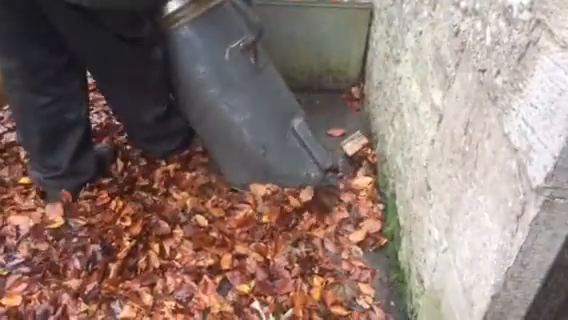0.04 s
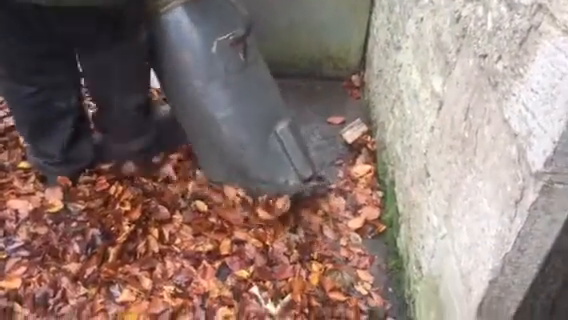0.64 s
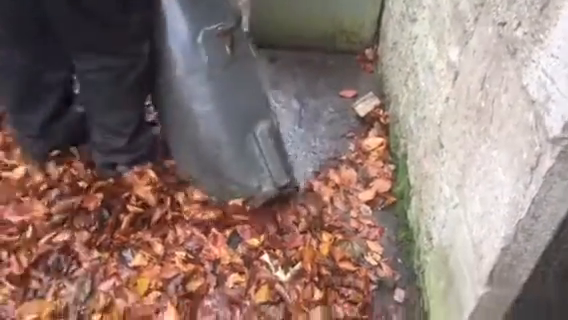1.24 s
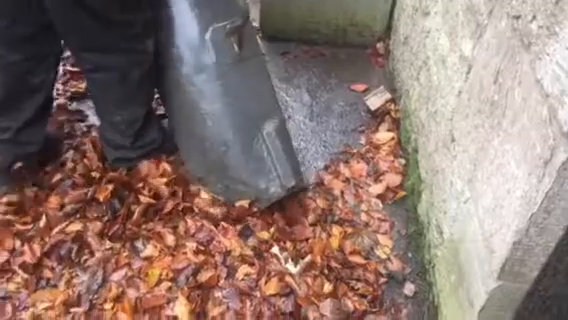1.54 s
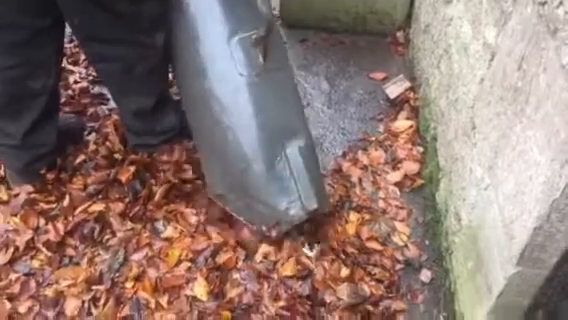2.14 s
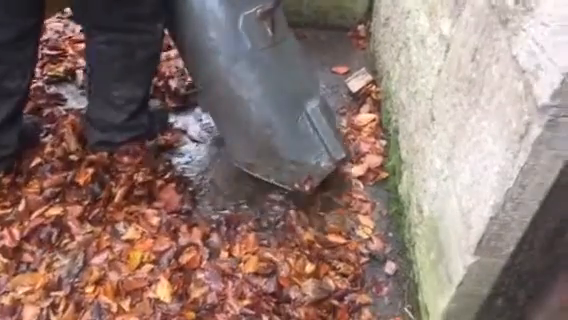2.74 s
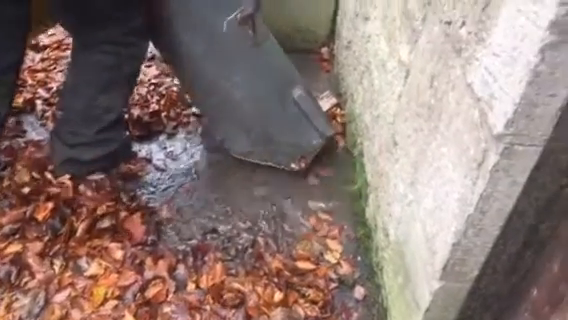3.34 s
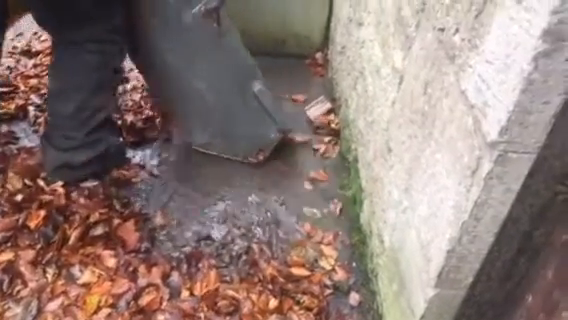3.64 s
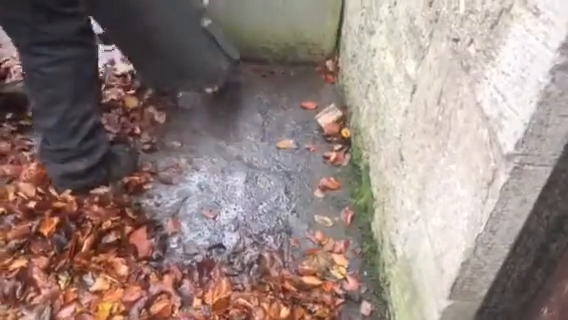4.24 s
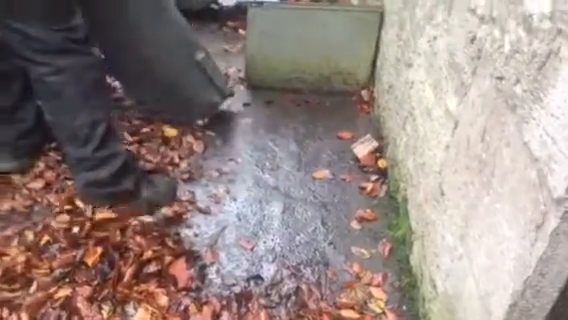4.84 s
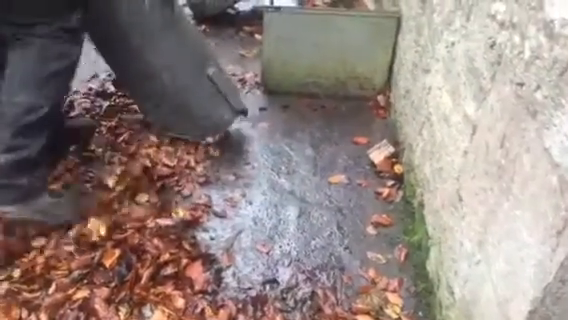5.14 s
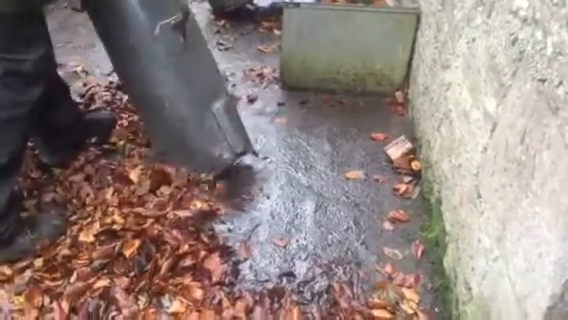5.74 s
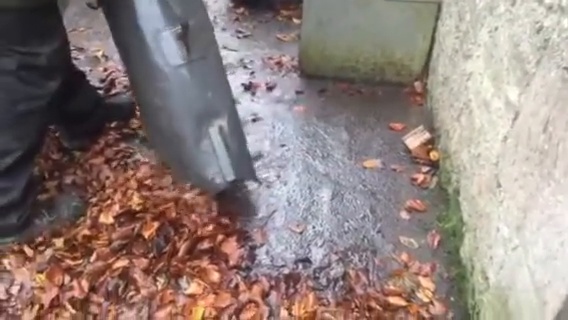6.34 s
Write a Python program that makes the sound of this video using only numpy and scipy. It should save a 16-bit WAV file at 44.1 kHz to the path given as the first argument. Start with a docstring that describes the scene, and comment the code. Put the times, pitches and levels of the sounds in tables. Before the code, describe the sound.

A loud engine-driven leaf vacuum runs close by outdoors for the whole six and a half seconds, holding a steady speed. Its low drone dominates, dipping briefly whenever leaves choke the intake. Above it a fainter fan whine throbs about four times a second, most clearly in the first three seconds. Air roars hollowly in the wide tube and hisses at the nozzle, mixed with a fine, dense patter of wet leaves lifted from the paving.

Short raspy slurps come at about 0.3, 0.5, 1.2, 2 and 2.5 seconds. From 3.4 to 4.2 seconds, clumps of leaves pass through the hose in a run of dull thumps, with low buffeting and more slurps, the strongest thump near 4 seconds. A lighter knock comes at 5.2 seconds. Further slurps and low gusts gather around 6 seconds, with another firm thump at 6.3, and the machine keeps running.

```python
"""Leaf vacuum on wet paving

An engine-driven leaf vacuum runs at a steady speed while its wide hose sweeps the ground. The impeller
(the wheel that sucks the air) drones, and a faster cooling fan whines above it. Air rushes into the
nozzle, wet leaves patter and slurp up the tube, and clumps thump in the hose. Heard close by, in mono."""
import sys
import numpy as np
from scipy import signal
from scipy.fft import rfft, irfft, next_fast_len
from scipy.io import wavfile

SR = 44100
rng = np.random.default_rng(int(sys.argv[2]) if len(sys.argv) > 2 else 0)


def generate_wav(sig):
    """Save sig (samples, or channels by samples) to the path in sys.argv[1] as 16-bit PCM at SR."""
    pcm = np.round(np.clip(np.atleast_2d(sig).T, -1, 1) * 32767).astype(np.int16)
    wavfile.write(sys.argv[1], SR, pcm)


N = 287091

# The fan's whine. Each row: time in seconds, relative level in dB, depth of its throb from 0 to 1.
FAN_WHINE = [(0, -37, .85), (.7, -44.5, .9), (1.8, -38, .7), (2.6, -39, .65), (3.1, -50, 0.2),
             (4.2, -41, 0.34), (5.4, -39.5, 0.4), (6.5, -41, 0.3)]


def impeller(angle, blades=3):
    """The blades drone at three times the shaft's speed, and sag when leaves choke the intake."""
    # The drone. Each row: time in seconds, relative level in dB.
    drone = [(0.0, -16), (0.25, -14.5), (1.63, -17), (1.72, -16), (3.24, -16), (3.66, -19), (4.42, -15.5),
             (4.86, -18.5), (5.15, -16.5), (5.51, -19), (6.44, -15), (6.51, -16.5)]
    # Brief chokes. Each row: middle in seconds, drop in dB.
    chokes = [(.18, 5), (.8, 6), (1.16, 6), (1.27, 3), (1.82, 2), (2.25, 2.5), (3.46, 3), (3.77, 4),
              (3.89, 3.5), (4.08, 1), (5.54, 2.5), (5.75, 3)]
    sag_db = sum(drop * swell(s, length=0.07) for s, drop in chokes)
    tone = rotor_tones(angle, [(blades, 0)], waver_db=0.62, wobble=0.065, rate=10.6)
    return from_db(in_time(drone)[0] - sag_db + 0.1) * tone


def engine(angle):
    """The engine hums with weaker tones tied to the turning of its shaft."""
    # Each row: multiple of the shaft's speed, level in dB.
    tones = [(1, -51), (1.5, -44.5), (2, -30.5), (3.5, -43.5), (4, -37), (4.5, -43.5), (5, -47.5),
             (5.5, -48.5), (6, -45.5), (9, -44.5), (19, -57.5), (20, -54.5), (30, -52)]
    return rotor_tones(angle, tones, waver_db=0.6, wobble=0.24, rate=3.9)


def cooling_fan(fan_angle, blades=5):
    """The fan whines at the rate its blades pass."""
    tone = rotor_tones(fan_angle, [(blades, 0)], waver_db=1.5, wobble=0.42, rate=31)
    return from_db(in_time(FAN_WHINE)[0] - 2.9) * tone


def fan_throb(first_crest_s=0.038):
    """Loudness of two close tones beating against each other: broad crests and narrow dips."""
    # Each row: time in seconds, throbs per second.
    pace = [(0, 3.6), (.7, 3.6), (2, 4.25), (3.5, 4.35), (4.5, 4.15), (5.5, 4.1), (5.8, 5.4), (6.5, 5.3)]
    depth = in_time(FAN_WHINE)[1]
    beats = np.cumsum(in_time(pace)[0]) / SR - first_crest_s * pace[0][1]
    return np.abs(1 + depth * np.exp(2j * np.pi * beats)) / np.sqrt(1 + depth ** 2)


def casing(fan_angle, throb):
    """The casing gives off weaker fan tones, its own ringing and a wash of air that throbs less."""
    # Each row: multiple of the fan's speed, relative level in dB.
    fan_tones = [(3, -43.5), (4, -53), (7, -52.5), (8, -46.5), (9, -46)]
    # Where the casing rings. Each row: pitch in Hz, width in Hz, relative level in dB.
    rings = [(710, 68, -42), (976, 38, -45.5), (1040, 34, -47.5), (1070, 72, -50), (1250, 27, -51.5),
             (1476, 230, -45)]
    # Each row: frequency in Hz, relative level in dB.
    wash_spectrum = [(250, -17), (480, -5.5), (600, 3.5), (720, -6), (880, -20), (1070, -11), (1400, -4.5),
                     (2200, -24), (6000, -9)]
    # How openly the casing is heard. Each row: time in seconds, gain in dB.
    openness = [(0, 0), (.4, 0.5), (1.2, -2), (1.6, -3.5), (2.8, -5), (4.3, -4), (4.8, -2.5), (5.4, -2.5),
                (5.8, -0.5), (6.5, -0.5)]
    tones = rotor_tones(fan_angle, fan_tones, waver_db=1.5, wobble=0.33, rate=8.9)
    ring = sum(from_db(db) * unit_level(resonance(rng.standard_normal(N), hz, width))
               for hz, width, db in rings)
    wash = from_db(-39.5) * coloured(rng.standard_normal(N), wash_spectrum)
    return from_db(in_time(openness)[0]) * (throb ** 0.65 * (tones + ring) + throb ** 0.17 * wash)


def hose_rumble():
    """Air buffets the hose, steadily and in gusts."""
    # Each row: middle in seconds, length in seconds, level in dB.
    gusts = [(.3, 1, -32), (3.464, 0.11, -27), (3.83, .18, -25), (4.026, 0.13, -19.5), (4.177, 0.2, -24),
             (5.65, 0.54, -32), (6.02, .12, -21), (6.25, 0.28, -27)]
    # Each row: frequency in Hz, relative level in dB.
    spectrum = [(20, -28), (33, -15), (48, 3.5), (70, 11.5), (100, 3), (140, 3), (220, -44), (400, -42)]
    strength = from_db(-38.5) + sum(from_db(db) * swell(s, length) for s, length, db in gusts)
    return strength * turbulence(spectrum, flutter_db=1.0, rate=21)


def tube_roar():
    """Air rings hollowly in the tube and roars, most strongly when the nozzle is buried in leaves."""
    # Each row: time in seconds, relative level in dB.
    roar_levels = [(0, -30.5), (.85, -33.5), (1.3, -35), (1.65, -32), (2, -27.5), (2.3, -36.5), (2.55, -30),
                   (3.3, -37), (3.6, -40), (4.2, -41.5), (4.8, -34), (5.7, -32.5), (6.1, -28.5),
                   (6.5, -31.5)]
    hollow_levels = [(0, -35.5), (.8, -36), (1.4, -40), (2, -39), (3, -40), (3.9, -36), (4.6, -36.5),
                     (5.3, -37), (6.5, -36)]
    # Each row: frequency in Hz, relative level in dB.
    roar_spectrum = [(50, -26), (90, -6.5), (130, 2), (190, 2.5), (230, -2), (262, 2), (300, -4.5),
                     (450, -18.5), (1200, -32)]
    hollow_spectrum = [(200, -22), (280, -20), (322, -1.5), (355, -1), (400, -0.5), (450, -12.5),
                       (560, -20.5), (1200, -56)]
    roar = turbulence(roar_spectrum, flutter_db=0.7, rate=12)
    hollow = turbulence(hollow_spectrum, flutter_db=1.3, rate=15)
    roar *= from_db(in_time(roar_levels)[0] - 0.5)
    hollow *= from_db(in_time(hollow_levels)[0] - 0.25)
    return roar + hollow


def nozzle():
    """Air rushes in and hisses past the rim, louder as it carries more leaves."""
    # Each row: time in seconds, relative levels of the rush and of the hiss in dB.
    flow = [(0, -31, -31), (.36, -30, -28), (.55, -31, -29), (.72, -33, -31.5), (.87, -30.5, -29),
            (1.35, -33.5, -33.5), (1.65, -33, -33.5), (1.73, -33, -29.5), (2.02, -30, -31.5),
            (2.2, -34.5, -32), (2.34, -33.5, -36), (2.51, -33, -31), (2.9, -33.5, -33), (3.15, -31.5, -31),
            (3.33, -34, -32), (3.77, -31.5, -33), (4.02, -33.5, -32.5), (4.4, -35, -33), (4.82, -34.5, -34),
            (5.05, -31, -30.5), (5.15, -35, -34.5), (5.27, -31, -31), (5.45, -33.5, -35), (5.84, -31, -30),
            (6.5, -31.5, -31)]
    # Each row: frequency in Hz, relative level in dB.
    rush_spectrum = [(250, -12), (480, 1), (600, -4.5), (800, 2), (920, -2), (1080, -1), (1350, -2),
                     (2100, -1), (3000, -4), (4500, -10.5), (8000, -18.5), (16000, -28)]
    hiss_spectrum = [(1000, -24), (2500, -9), (4200, 0), (6000, 0.5), (9200, -0.5), (11500, -2.5),
                     (15500, -5)]
    rush_db, hiss_db = in_time(flow)
    eddies = from_db(0.64 * drift(15))
    rush = from_db(rush_db + 0.34) * turbulence(rush_spectrum, flutter_db=1.1, rate=29)
    hiss = from_db(hiss_db + 1.46) * turbulence(hiss_spectrum, flutter_db=1.02, rate=19)
    leaves = from_db(rush_db - 5) * leaf_patter()
    return eddies * (rush + hiss + leaves)


def leaf_patter(ticks_per_s=4000, spread_db=3, flurry_db=5):
    """Leaf scraps tick against the tube; each size has its own pitch and comes in its own flurries."""
    hits = rng.random(N) < ticks_per_s / SR
    strengths = from_db(spread_db * np.minimum(rng.exponential(1, N), 4)) * rng.choice([-1, 1], N)
    pitches = np.geomspace(1200, 11000, 40)
    scrap_size = rng.integers(0, len(pitches), N)
    out = np.zeros(N)
    for size, hz in enumerate(pitches):
        ticks = strengths * hits * (scrap_size == size) * from_db(flurry_db * drift(13))
        out += resonance(ticks, hz, width=0.046 * hz) / np.sqrt(hz)
    return unit_level(out)


def slurps():
    """A wad of wet leaves narrows the opening for a moment, making a rasp that can slide in pitch."""
    # Each row: middle in seconds, length in seconds, pitch in Hz, slide in octaves, level in dB.
    wads = [(.32, .14, 1300, 0, -34.5), (0.536, 0.057, 6000, 0, -30), (1.187, 0.041, 2000, 0.053, -32.5),
            (1.897, .03, 2490, 0, -33), (1.997, 0.19, 838, 0.073, -40), (2.02, 0.057, 1900, .2, -39),
            (2.533, 0.096, 6240, -0.086, -35), (3.656, 0.055, 4700, -0.09, -32),
            (3.667, 0.27, 1055, 0, -40), (3.738, 0.036, 2365, 0.37, -27), (4.03, .025, 5000, 0, -38),
            (4.088, 0.033, 1700, 0.73, -31.5), (5.103, 0.034, 2185, 0.25, -31.5),
            (5.221, .03, 1800, .4, -30.5), (5.29, 0.05, 3810, 0.35, -32.5), (5.828, 0.1, 3750, 0.17, -32.5),
            (5.99, .12, 3620, 0.37, -32.5), (6.155, .06, 3000, -1.15, -30), (6.483, 0.065, 5500, 0.34, -29)]
    out = np.zeros(N)
    for s, length, hz, slide, db in wads:
        position = np.linspace(-0.5, 0.5, int(length * SR))
        lowpass = signal.butter(2, 0.19 * hz, fs=SR, output="sos")
        rasp = unit_level(signal.sosfilt(lowpass, rng.standard_normal(N // 10))[:len(position)])
        tone = np.sqrt(2) * np.sin(2 * np.pi * np.cumsum(hz * 2 ** (slide * position)) / SR)
        # Multiplying by the tone moves the low noise up around its pitch.
        add(out, s - length / 2, from_db(db) * np.cos(np.pi * position) * rasp * tone)
    return out


def thumps():
    """Each clump makes the soft hose wall ring briefly, with a weaker, shorter tone above."""
    # Each row: start in seconds, pitch in Hz, seconds to fade by 60 dB, level in dB.
    clumps = [(3.412, 160, 0.046, -10.5), (3.46, 48.5, .2, -25), (3.80, 42, .2, -26),
              (3.856, 180, .09, -18), (3.914, 140, .08, -16), (3.97, 66, 0.23, -20),
              (4.004, 142, 0.057, -9), (4.101, 76.4, 0.34, -16), (4.206, 58, .15, -20),
              (5.223, 306, 0.034, -14.5), (6.005, 48, .12, -24), (6.317, 132, 0.06, -9)]
    out, t = np.zeros(N), np.arange(SR // 2) / SR
    for s, hz, ring_s, db in clumps:
        low = from_db(db - 60 * t / ring_s) * np.sin(2 * np.pi * hz * t)
        high = from_db(db - 10 - 60 * t / (0.64 * ring_s)) * np.sin(2 * np.pi * 2.14 * hz * t)
        add(out, s, low - high)
    return out


def rotor_tones(angle, tones, waver_db, wobble, rate):
    """Tones of a spinning part, each wavering in level and in phase (wobble, in radians)."""
    out = np.zeros(N)
    for multiple, db in tones:
        level = np.sqrt(2) * from_db(db + waver_db * drift(rate))
        out += level * np.sin(multiple * angle + wobble * drift(rate) + rng.uniform(0, 2 * np.pi))
    return out


def turbulence(spectrum, flutter_db, rate):
    """Air noise whose strength flutters as the air swirls."""
    return coloured(rng.standard_normal(N) * from_db(flutter_db * drift(rate)), spectrum)


def drift(rate):
    """A smooth random wander of about 1 either way; a higher rate in Hz makes it quicker."""
    r = np.exp(-80 * np.pi * rate / SR)
    slow = signal.lfilter([1], [1, -2 * r, r * r], rng.standard_normal(N // 40 + 2002))[2000:]
    return np.interp(np.arange(N) / 40, np.arange(len(slow)), unit_level(slow))


def coloured(x, spectrum):
    """Shape the lows and highs of x to a spectrum, at an average level of 1."""
    hz, db = np.transpose(spectrum)
    size = next_fast_len(N)
    bins = np.maximum(np.arange(size // 2 + 1) * SR / size, 1)
    gain = from_db(np.interp(np.log(bins), np.log(hz), db))
    return unit_level(irfft(rfft(x, size) * gain, size)[:N])


def resonance(x, hz, width):
    """Keep the band of x around one pitch; width is in Hz."""
    r = np.exp(-np.pi * width / SR)
    feedback = [1, -2 * r * np.cos(2 * np.pi * hz / SR), r * r]
    return signal.lfilter(np.array([1, 0, -1]) * (1 - r * r) / 2, feedback, x + 1e-18)


def swell(s, length):
    """A smooth rise to 1 at time s and back, lasting length seconds."""
    return np.cos(np.pi * np.clip((np.arange(N) / SR - s) / length, -0.5, 0.5)) ** 2


def in_time(rows):
    """Join a table's rows into one curve for each column after the time."""
    s, *columns = np.transpose(rows)
    return [np.interp(np.arange(N) / SR, s, column) for column in columns]


def add(out, s, sound):
    """Mix a short sound in at s seconds."""
    at = int(np.clip(round(s * SR), 0, N - 1))
    out[at:at + len(sound)] += sound[:N - at]


def from_db(db):
    """Turn decibels into a multiplier."""
    return 10 ** (np.asarray(db) / 20)


def unit_level(x):
    """Scale to an average (rms) level of 1."""
    return x / np.sqrt(np.mean(x ** 2) + 1e-20)


def scene():
    """The machine, the air and the leaves, alike in both channels."""
    # The engine's shaft. Each row: time in seconds, turns per second.
    shaft_speed = [(0, 36.1), (.8, 36.0), (2, 35.87), (3.2, 35.72), (4.4, 35.78), (5.6, 35.9), (6.5, 35.85)]
    angle = 2 * np.pi * np.cumsum(in_time(shaft_speed)[0]) / SR
    fan_angle = 3.82 * angle  # the fan is geared up
    throb = fan_throb()
    machine = engine(angle) + throb * cooling_fan(fan_angle) + casing(fan_angle, throb) + impeller(angle)
    suction = hose_rumble() + tube_roar() + nozzle() + slurps() + thumps()
    return np.tile(machine + suction, (2, 1))


def record(dry, cutoff_hz=15750):
    """The treble has three shallow dips and a steep top edge."""
    # Each row: frequency in Hz, width in Hz, depth from 0 to 1.
    dips = [(4900, 250, 0.5), (7700, 900, 0.29), (10420, 800, 0.5)]
    for hz, width, depth in dips:
        dry = dry - depth * resonance(dry, hz, width)
    return signal.sosfilt(signal.ellip(12, 0.1, 80, cutoff_hz, fs=SR, output="sos"), dry)


dry = scene()
out = record(dry)
generate_wav(out)
```